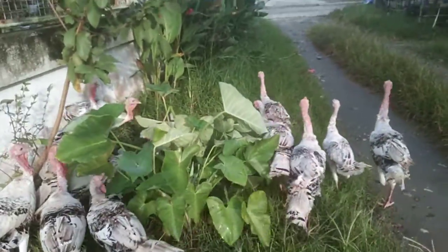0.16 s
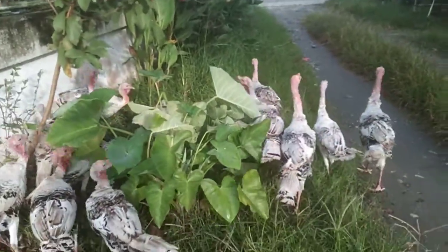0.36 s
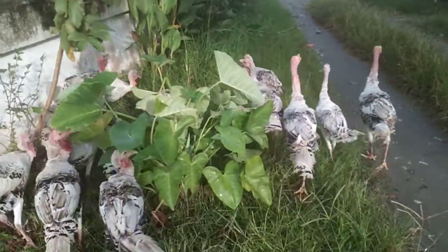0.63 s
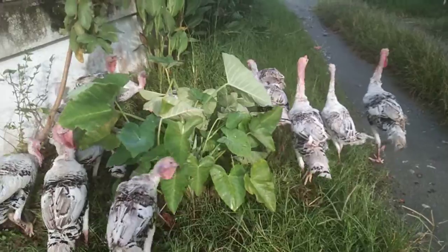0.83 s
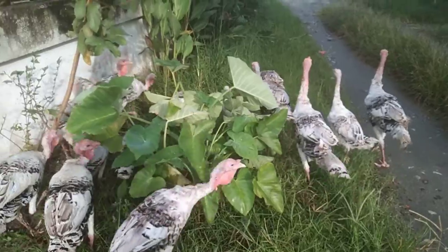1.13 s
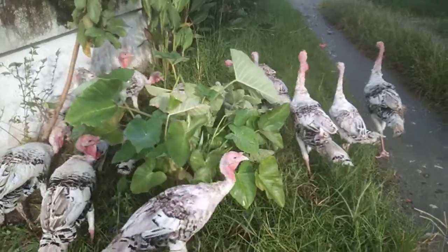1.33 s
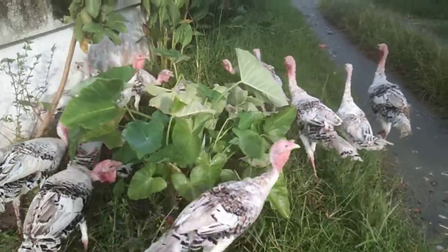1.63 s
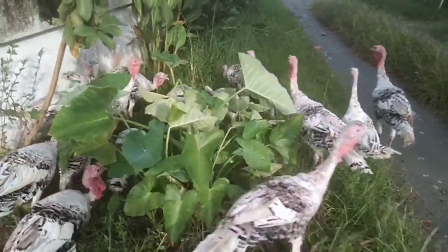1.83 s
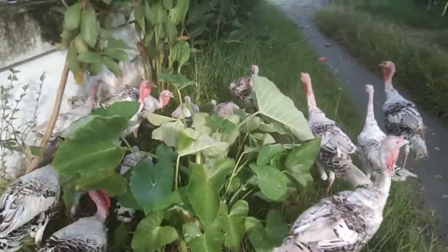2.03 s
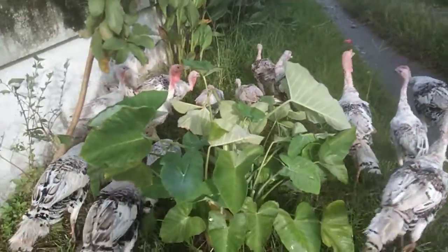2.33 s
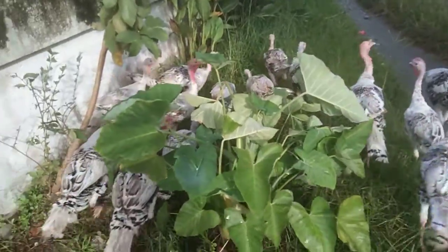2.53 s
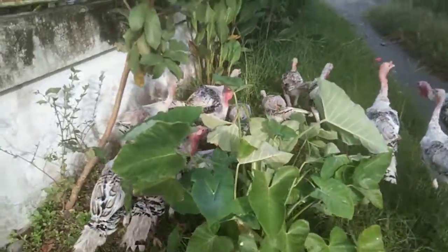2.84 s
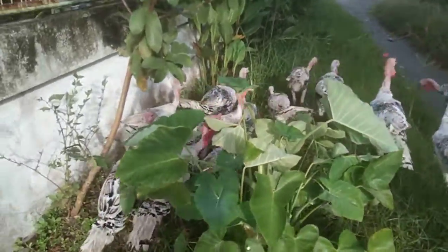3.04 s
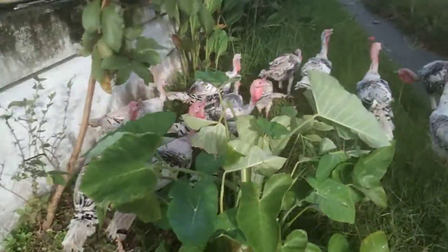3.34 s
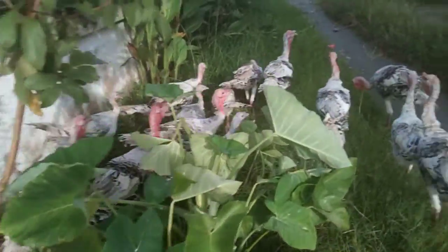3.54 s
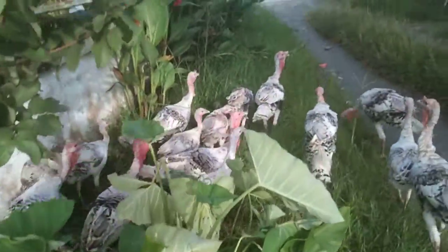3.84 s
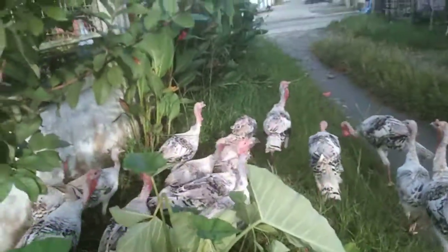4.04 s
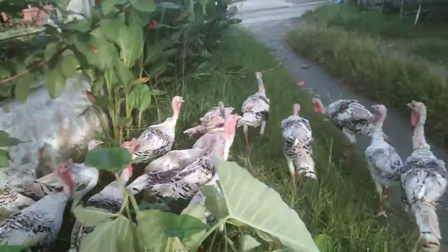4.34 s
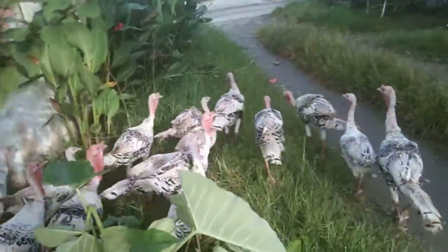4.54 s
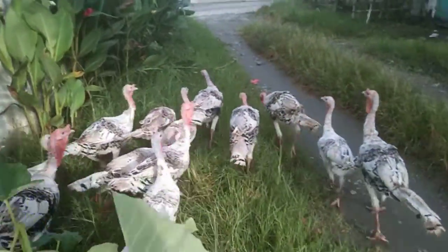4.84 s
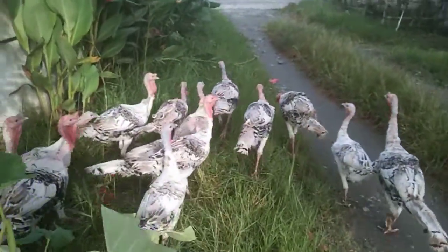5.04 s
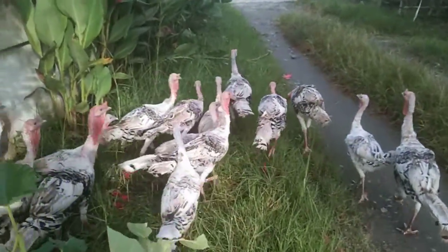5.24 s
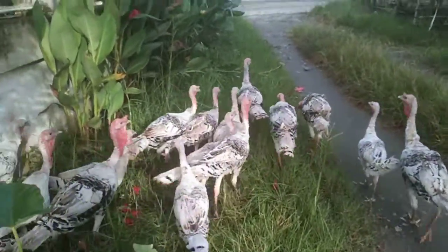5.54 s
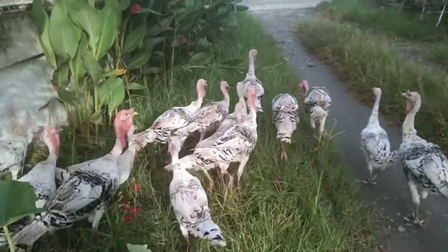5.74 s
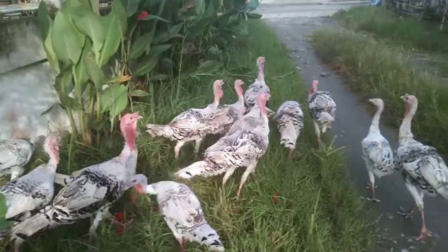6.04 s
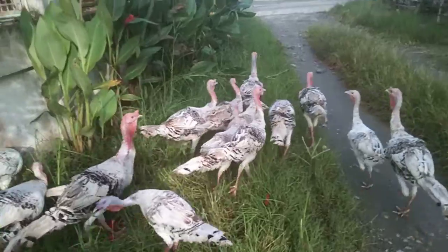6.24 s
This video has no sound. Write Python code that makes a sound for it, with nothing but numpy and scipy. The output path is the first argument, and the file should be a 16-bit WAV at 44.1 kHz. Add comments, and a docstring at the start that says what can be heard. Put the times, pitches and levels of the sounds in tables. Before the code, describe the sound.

After a soft peep and a rustle, one nearby turkey lets out a loud, raspy, drawn-out call that ends on a held note. Many quieter peeps and clucks follow as the flock moves through weeds, with rustling, small stem snaps and a dull thud midway. The outdoor background holds faint high insect trills, far chirps and a low hum.

```python
"""Turkeys in weeds beside a wall, over insect trills, far hiss and a wavering low hum.
0-0.6 s: a peep, a cluck, a rustle. 0.6-2.2 s: one close bird gives a hoarse four-part call,
a vibrating membrane shaken by unsteady airflow; the wall and trees answer.
From 2.2 s: the flock pushes on with soft gliding peeps and clucks. Bodies brush leaves and grass,
stems snap underfoot (densest near 4.2 s, with a dull thud), and small chirps sound far off."""
import sys
import numpy as np
from scipy import signal
from scipy.fft import rfft, irfft, next_fast_len
from scipy.io import wavfile
from scipy.ndimage import uniform_filter1d, map_coordinates

SR = 44100
rng = np.random.default_rng(int(sys.argv[2]) if len(sys.argv) > 2 else 0)


def put_to_file(sound):
    """Save the sound as 16-bit audio at rate SR, in the file named by the first command-line argument."""
    columns = np.atleast_2d(sound).T  # one column per channel
    safe = np.clip(columns, -1, 1)
    whole_steps = np.round(safe * 32767)
    wavfile.write(sys.argv[1], SR, whole_steps.astype(np.int16))


N = 281358

# noise colours: (frequency [Hz], relative density [dB])
AIR_SPECTRUM = [(2500, -16.5), (3600, -19), (6500, -10.5), (9200, -11), (12000, -6.5), (15500, -17)]
HUM_SPECTRUM = [(25, -24.5), (55, -13.5), (90, 0.5), (125, -5.5), (190, -16.5), (300, -49)]
THUD_SPECTRUM = [(140, -19), (200, -8.5), (400, -6.5), (520, -10), (700, -75.5)]
LEAF_SPECTRUM = [(350, -52), (600, -6.5), (1300, -3), (2000, -1), (2700, -10.5), (3000, -15), (3300, -49)]
GRASS_SPECTRUM = [(3000, -76.5), (3400, -26), (3900, -9), (6500, -6), (7800, -8), (9100, -7),
                  (11500, -18.5), (15500, -28)]
RASP_SPECTRUM = [(400, -65.5), (600, -13), (1200, -2), (1700, 1.5), (2300, 6.5), (2750, -9), (3200, -2.5),
                 (3800, -18.5), (5800, -17), (9000, -24.5), (12000, -27.5), (16000, -51)]
# background envelopes: (time [s], level [dB])
HUM_LEVEL = [(0.0, -57.5), (0.21, -48), (0.28, -56.5), (1.26, -62.5), (1.56, -83.5), (1.85, -59),
             (1.97, -79.5), (2.26, -51.5), (2.36, -61.5), (2.59, -59.5), (2.93, -85.5), (3.04, -52),
             (3.29, -69), (4.21, -64), (5.54, -71), (5.63, -57.5), (5.93, -85.5), (6.38, -62)]
TRILL_LEVEL = [(0, -68), (.35, -60), (.6, -75), (2.2, -60.5), (2.9, -62.5), (3.5, -57.5), (4.3, -57.5),
               (4.7, -56), (5.3, -60.5), (6.38, -58)]
# insect bands: (centre [Hz], width [Hz], gain [dB])
TRILL_BANDS = [(7417, 230, -4.5), (8250, 310, -1.5)]
# soft thuds: (time [s], level [dB], t60 [s])
THUD_HITS = [(0, -53, 1), (.71, -45.5, 0.29), (1.77, -50.5, .3), (2.12, -64, 0.24), (2.97, -54.5, 0.16),
             (3.5, -48.5, 0.21), (3.6, -48, 0.28), (4.2, -39.5, 0.3), (4.81, -54.5, 0.22)]
# far chirps: (time [s], level [dB], start pitch [Hz], t60 [s])
FAR_CHIRPS = [(2.7313, -50, 4740, 0.3), (3.1118, -48, 4180, 0.18), (3.661, -47, 4840, 0.23),
              (4.0694, -53.5, 3720, 0.64), (5.0, -61, 3440, 0.3), (5.555, -55, 3510, 0.22),
              (5.612, -52.5, 4120, 0.18), (6.134, -61, 4820, 0.24)]

# flock stirring: (time [s], leaves [dB], leaf gain below LEAF_SHELF_HZ [dB], grass [dB])
RUSTLE_LEVELS = [(0, -49.5, -3.5, -65), (.3, -70, 1, -62.5), (.62, -93, -1.5, -82), (2.2, -55.5, 4, -60.5),
                 (2.4, -78, -21, -61.5), (2.65, -75.5, -6.5, -61), (2.9, -61.5, 2, -67),
                 (3.15, -62, -8, -69), (3.35, -58, -21, -75), (3.47, -55.5, -22.5, -59.5),
                 (3.55, -52.5, -5, -58), (3.85, -61, -11, -77.5), (3.96, -60, -1, -81),
                 (4.13, -76, -7.5, -65), (4.3, -53.5, 7.5, -52), (4.8, -57, 0.5, -59.5),
                 (5.13, -65.5, 3, -61), (5.22, -86, -2, -68), (5.5, -88, 7, -106), (5.7, -58.5, 4, -74),
                 (6.38, -60, -15, -62.5)]
# single bodies passing: (time [s], 15 dB decay time [s], leaves [dB], grass [dB])
BODY_BRUSHES = [(0.04, 0.039, -54, -51.5), (.185, 0.03, -54, -53), (2.37, 0.051, -51, -42.5),
                (2.63, 0.057, -82, -57.5), (2.927, 0.042, -71, -61), (3.009, 0.049, -44, -73),
                (3.11, 0.033, -86, -74), (3.388, 0.07, -76, -50), (3.53, 0.052, -68, -53),
                (3.667, 0.102, -52, -59), (3.996, 0.1, -55.5, -47.5), (4.158, 0.075, -51, -39),
                (4.192, 0.054, -41.5, -51.5), (4.788, 0.035, -39, -39.5), (5.591, 0.023, -41.5, -69.5),
                (6.17, 0.085, -45, -62.5)]
# stems underfoot: (time [s], bright part [dB], dull part [dB], t60 [s])
STEM_SNAPS = [(.181, -49.5, -52, 0.086), (0.3164, -45, -46.5, 0.24), (2.379, -47, -56, 0.1),
              (2.6171, -45, -63.5, 0.12), (2.9599, -49.5, -72, 0.072), (3.5032, -34, -42, 0.1),
              (3.5317, -47, -29, 0.046), (3.646, -49.5, -43.5, 0.073), (4.0133, -52.5, -35, 0.04),
              (4.154, -32, -44, 0.051), (4.1617, -40, -30.5, 0.039), (4.1982, -29, -44.5, 0.17),
              (4.208, -30.5, -26, 0.13), (4.2252, -26.5, -33.5, 0.035), (4.815, -42.5, -27, 0.054),
              (4.8526, -45, -69, 0.097), (5.04, -62.5, -53, .06), (5.12, -54, -56.5, 0.089),
              (5.7416, -56, -46, 0.08), (5.971, -58, -44, 0.13), (6.0117, -45, -42, 0.19),
              (6.176, -48.5, -68, 0.11), (6.3366, -47.5, -58, 0.16)]

# peeps: (start [s], end [s], pitch [Hz], sag [Hz/s], drop time constant [s],
#         start level [dB], knee level [dB], end level [dB])
PEEP_NOTES = [(0, 0.07, 1360, 300, 0.014, -44.5, -57.5, -44.5),
              (2.605, 2.836, 1164, 148, 0.012, -87, -52, -41.5),
              (2.962, 3.049, 1357, 1500, .012, -61, -49, -43),
              (3.688, 3.845, 1484, 597, 0.051, -43, -46.5, -48),
              (3.89, 4.002, 1870, 2180, .006, -48.5, -54, -70),
              (3.911, 4.026, 1500, 490, 0.014, -62, -53, -51),
              (4.06, 4.255, 1556, 2960, 0.021, -63, -50, -49),
              (4.32, 4.585, 1240, 223, 0.015, -65, -43.5, -45),
              (4.355, 4.431, 1600, 4080, .03, -48, -47.5, -43.5),
              (4.58, 4.636, 1480, 5050, 0.019, -58, -49.5, -41.5),
              (4.745, 4.803, 1430, 1010, 0.013, -69, -58, -35.5),
              (5.332, 5.627, 1602, 398, .033, -63, -42.5, -48.5),
              (5.74, 6.006, 1257, 418, 0.013, -55, -50, -41),
              (5.783, 5.882, 1587, 945, .012, -50, -36, -52),
              (6.081, 6.22, 1557, 2290, 0.015, -48.5, -57.5, -38),
              (6.29, 6.401, 848, 1830, 0.0075, -50, -42, -48),
              (6.319, 6.412, 1520, 1590, 0.0074, -64, -48, -58)]
# clucks: (time [s], level [dB], top pitch [Hz])
CLUCK_NOTES = [(.18, -52.5, 842), (2.565, -57.5, 1150), (2.89, -36, 1400), (3.24, -56, 1200),
               (3.885, -43, 1500), (3.985, -51, 1115), (4.312, -41, 1270), (4.487, -38, 1340),
               (4.637, -35, 1530), (5.308, -48, 1300), (5.698, -37, 1600), (5.74, -35.5, 826),
               (6.056, -34, 1530), (6.23, -42, 1040)]
# throat response for peeps and clucks: (frequency [Hz], gain [dB])
FLOCK_THROAT = [(600, -0.5), (750, 0.5), (950, -3), (1150, 1.5), (1320, -1), (1500, 1), (1800, -5.5)]
OCTAVE_GAIN = [(1300, -30), (1700, -12), (2300, -14), (2700, -60)]

# close call, a table per note, two voices at times: (time [s], pitch [Hz])
CALL_PITCH = [
    [(.65, 796), (.675, 798), (.7, 779), (.77, 764), (.82, 750), (.89, 750)],
    [(.895, 700), (.91, 740), (.935, 746), (.97, 742), (1.0, 714), (1.04, 724), (1.1, 736), (1.18, 742),
     (1.24, 735), (1.3, 709), (1.35, 700), (1.385, 638), (1.45, 604), (1.5, 597), (1.57, 589), (1.605, 676)],
    [(1.597, 745), (1.61, 790), (1.65, 794), (1.85, 790), (2.0, 782), (2.08, 764), (2.1, 700), (2.15, 640)],
    [(.635, 570), (.66, 612), (.68, 641), (.702, 715)],
    [(.77, 626), (.79, 594), (.88, 590), (.915, 679)],
    [(.925, 832), (.95, 853), (1.0, 820), (1.08, 820)],
]
# same notes: (time [s], voice [dB], partials above the 4th [dB], rasp [dB])
CALL_LEVELS = [
    [(.65, -47, -75, -37), (.675, -38, -47, -45.5), (.692, -40, -47, -43.5), (.7, -16.5, -48, -36),
     (.76, -18.5, -51, -34), (.772, -45, -52.5, -48), (.8, -38, -50, -42.5), (.89, -50, -71, -40)],
    [(.895, -46.5, -59.5, -43.5), (.908, -24, -49, -37), (.935, -21, -39.5, -36.5),
     (.99, -29, -38.5, -33.5), (1.03, -32.5, -37.5, -38.5), (1.07, -22.5, -40, -41),
     (1.18, -22.5, -37, -47.5), (1.24, -22, -37, -56), (1.265, -29.5, -39, -46), (1.3, -21.5, -39.5, -46),
     (1.34, -24.5, -43.5, -37), (1.4, -20, -44, -46.5), (1.5, -35, -50.5, -35), (1.605, -23.5, -54.5, -41)],
    [(1.595, -47.5, -54, -44), (1.607, -22, -53, -36), (1.7, -21, -39, -43.5), (1.78, -21, -38.5, -48.5),
     (1.86, -18, -39, -51.5), (2.01, -18.5, -44.5, -49.5), (2.028, -26.5, -37.5, -49),
     (2.046, -19, -39.5, -53), (2.075, -23.5, -41.5, -44), (2.1, -33.5, -45.5, -36.5),
     (2.15, -57, -52.5, -60)],
    [(.633, -48, -69, -41), (.645, -30, -69.5, -47.5), (.68, -22.5, -56, -56.5),
     (.704, -29.5, -72.5, -60.5)],
    [(.77, -21.5, -75, -61.5), (.79, -30.5, -75, -56.5), (.88, -36, -58, -49), (.917, -19.5, -57, -54)],
    [(.925, -34.5, -76, -57.5), (.945, -20.5, -71, -49), (.98, -17.5, -75.5, -54), (1.08, -46, -83, -55.5)],
]
# airflow: (time [s], unsteadiness [0-1])
HOARSENESS = [(.64, .5), (.7, .05), (.76, .05), (.79, .6), (.9, .45), (.97, .7), (1.05, .6), (1.08, .07),
              (1.24, .09), (1.3, .4), (1.58, .6), (1.63, .1), (1.7, .04), (2.0, .04), (2.07, .25),
              (2.09, .95)]
# subharmonics, every other cycle stronger: (time [s], level [dB])
SUBHARMONIC_LEVEL = [(1.7, -68), (1.84, -67.5), (1.99, -60), (2.05, -78)]
# throat and beak response, partials 1-4 (LOW) and above (HIGH): (frequency [Hz], gain [dB])
THROAT_LOW = [(580, -37), (740, -25), (850, -16.5), (1200, -7.5), (1480, -1), (1700, -0.5), (1900, -22.5),
              (2120, 1.5), (2230, -5.5), (2340, -30), (2550, -20.5), (2950, -25.5), (3150, -18.5),
              (3400, -8)]
THROAT_HIGH = [(2800, -2.5), (3200, 16.5), (3500, -20.5), (4300, -11.5), (5000, -14), (5900, -5.5),
               (6700, -6.5), (7400, -10), (8800, -11), (9700, -16.5), (11000, -32.5), (16000, -41)]
HELD_THROAT_LOW = [(640, -15.5), (790, -31), (1300, -4), (1580, 0), (2000, -17), (2370, -30), (3000, -41),
                   (3170, -22)]
HELD_THROAT_HIGH = [(3900, -19), (4750, -27.5), (5530, -1.5), (6300, -13.5), (7900, -13.5), (8700, -31.5),
                    (9500, -21), (11000, -24), (16000, -49.5)]
# echo of wall and trees: (frequency [Hz], t60 [s])
YARD_DECAY = [(500, 0.87), (1500, 0.47), (4000, 0.51), (10000, 0.05)]

LEAF_SHELF_HZ, BRUSH_RISE_S, CRACK_DB = 1500, .012, -4.5
SLACK_HZ, KNEE_TIME_CONSTANTS = 640, 3.5  # slack membrane's pitch; length of a peep's drop
POP_S, POP_HZ, CLUCK_S, CLUCK_FADE_DB = .006, 750, .024, 16
HELD_AFTER_S = 2.0  # the call note ending after this is the held one
FUNDAMENTAL_DB_PER_DB, SWELL_DB = .61, 3.5
BAND_LIMIT_HZ = 15800


def amp(db):
    """Decibels to gain."""
    return 10 ** (np.asarray(db) / 20)


def unit(x):
    """Scale to rms 1."""
    return x / np.sqrt(np.mean(x ** 2) + 1e-20)


def along(points, hz):
    """Read (frequency [Hz], value) points on a log axis."""
    knots_hz, values = np.transpose(points)
    return np.interp(np.log(hz + 1), np.log(knots_hz + 1), values)


def curves(rows):
    """Per-sample curve for each column after the time."""
    times_s, *columns = np.transpose(rows)
    return [np.interp(np.arange(N) / SR, times_s, c) for c in columns]


def note(rows, edge_s):
    """Sample indices, column curves and edge fade of one note."""
    times_s, *columns = np.transpose(rows)
    at = np.arange(max(0, round(times_s[0] * SR)), min(N, round(times_s[-1] * SR)))
    t = at / SR
    ramp = np.clip(np.minimum(t - times_s[0], times_s[-1] - t) / edge_s, 0, 1)
    return at, [np.interp(t, times_s, c) for c in columns], np.sin(ramp * np.pi / 2) ** 2


def wobble(rate_hz):
    """Smooth random curve with knots at rate_hz."""
    knots = rng.standard_normal(int(N * rate_hz / SR) + 4)
    return map_coordinates(knots, [np.arange(N) * rate_hz / SR])


def shaky(share, rate_hz):
    """Complex gain near unit power: steady but for a wandering share."""
    share = np.clip(share, 0, 1)
    return np.sqrt(1 - share ** 2) + share * (wobble(rate_hz) + 1j * wobble(rate_hz)) / np.sqrt(2)


def bursts(rows, rise_s):
    """Gain curve of decaying bursts: (time [s], level [dB], t60 [s])."""
    out, t = np.zeros(N + SR), np.arange(SR // 2) / SR
    for start_s, db, t60_s in rows:
        out[round(start_s * SR):][:len(t)] += (1 - np.exp(-t / rise_s)) * amp(db - 60 * t / t60_s)
    return out[:N]


def filtered(x, response):
    """Apply a zero-phase gain, response(hz)."""
    size = next_fast_len(N + SR // 2)
    return irfft(rfft(x, size) * response(np.fft.rfftfreq(size, 1 / SR)), size)[..., :N]


def rush(spectrum, gain, patchy_db, grain_db):
    """Coloured noise with spiky grains and streaks of random gain."""
    spiky = rng.standard_normal(N) * amp(grain_db * wobble(600))
    bins = signal.stft(spiky, nperseg=512)[2]
    streaks = uniform_filter1d(rng.standard_normal(bins.shape), size=4, axis=0)
    streaks = uniform_filter1d(streaks, size=18, axis=1)
    noise = signal.istft(bins * amp(patchy_db * unit(streaks)), nperseg=512)[1][:N]
    colour = lambda hz: amp(along(spectrum, hz))
    return filtered(gain * noise, colour) / np.std(filtered(noise, colour))


def yard(x):
    """Echo of wall and trees; each frequency decays at its own rate."""
    hz, t, bins = signal.stft(rng.standard_normal(SR), SR, nperseg=256)
    decay = amp(-60 * t / along(YARD_DECAY, hz)[:, None])
    tail = signal.istft(bins * decay, SR, nperseg=256)[1]
    delayed = np.pad(x, (500, 0))
    return signal.fftconvolve(delayed, tail / np.linalg.norm(tail))[:N]


def air():
    """Steady far hiss."""
    return rush(AIR_SPECTRUM, amp(-72), patchy_db=5, grain_db=3)


def hum():
    """Far low hum, wavering in level."""
    return rush(HUM_SPECTRUM, amp(curves(HUM_LEVEL)[0]), patchy_db=0, grain_db=-.5)


def thuds():
    """Dull thuds near the microphone, over a faint floor."""
    return rush(THUD_SPECTRUM, amp(-86) + bursts(THUD_HITS, rise_s=.01), patchy_db=6, grain_db=-.5)


def insects():
    """Many far trills blur into narrow bands, each fluttering on its own."""
    out = np.zeros(N)
    for centre_hz, width_hz, db in TRILL_BANDS:
        band = filtered(rng.standard_normal(N), lambda hz: np.exp(-((hz - centre_hz) / width_hz) ** 2))
        out += amp(db + 2 * wobble(6) + 2 * wobble(35)) * unit(band)
    return amp(curves(TRILL_LEVEL)[0]) * out


def chirps():
    """Small far chirps: husky, decaying, falling in pitch."""
    out, t = np.zeros(N + SR), np.arange(SR // 5) / SR
    husky = shaky(.95, rate_hz=420)
    for start_s, db, hz, t60_s in FAR_CHIRPS:
        at = round(start_s * SR) + np.arange(len(t))
        envelope = (1 - np.exp(-t / .0017)) * amp(db - 60 * t / t60_s)
        phase = 2 * np.pi * hz * (t - .25 * t ** 2)
        out[at] += envelope * (husky[at] * np.exp(1j * phase)).imag
    return out[:N]


def rustle():
    """Bodies brush leaves and grass; stems snap, then shake out."""
    leaf_brush = bursts([(s, db, 4 * decay_s) for s, decay_s, db, _ in BODY_BRUSHES], BRUSH_RISE_S)
    grass_brush = bursts([(s, db, 4 * decay_s) for s, decay_s, _, db in BODY_BRUSHES], BRUSH_RISE_S)
    crack = bursts([(s, db, .007) for s, db, _, _ in STEM_SNAPS], rise_s=1e-4)
    knock = bursts([(s, db, .007) for s, _, db, _ in STEM_SNAPS], rise_s=1e-4)
    grass_shake = bursts([(s, db - 8, t60_s) for s, db, _, t60_s in STEM_SNAPS], rise_s=5e-4)
    leaf_shake = bursts([(s, db - 4.5, t60_s) for s, _, db, t60_s in STEM_SNAPS], rise_s=5e-4)
    leaf_db, shelf_db, grass_db = curves(RUSTLE_LEVELS)
    leaf_gain = amp(leaf_db + 2 * wobble(12)) + leaf_brush + knock + leaf_shake
    leaves = rush(LEAF_SPECTRUM, leaf_gain, patchy_db=5, grain_db=2.5)
    leaves += (amp(shelf_db) - 1) * filtered(leaves, lambda hz: 1 / (1 + (hz / LEAF_SHELF_HZ) ** 8))
    grass_gain = amp(grass_db + 2.5 * wobble(25) + 2 * wobble(7)) + grass_brush + crack + grass_shake
    grass = rush(GRASS_SPECTRUM, grass_gain, patchy_db=4, grain_db=3)
    bright_noise = unit(np.diff(rng.standard_normal(N + 1)))
    return leaves + grass + amp(CRACK_DB) * crack * bright_noise


def peeps():
    """Notes that sag, then drop ever faster to the slack membrane's pitch."""
    for start_s, end_s, start_hz, sag_hz_per_s, drop_s, start_db, knee_db, end_db in PEEP_NOTES:
        knee_s = max(start_s + .012, end_s - KNEE_TIME_CONSTANTS * drop_s)
        at, (db,), fade = note([(start_s, start_db), (knee_s, knee_db), (end_s, end_db)], edge_s=.004)
        sagging_hz = start_hz - sag_hz_per_s * (at / SR - start_s)
        hz = sagging_hz - (sagging_hz - SLACK_HZ) * np.exp((at / SR - end_s) / drop_s)
        yield at, hz, db, fade


def clucks():
    """Notes that pop, flick upward and die away."""
    for start_s, pop_db, top_hz in CLUCK_NOTES:
        rows = [(start_s, SLACK_HZ, pop_db - 12),
                (start_s + POP_S, POP_HZ, pop_db),
                (start_s + CLUCK_S, top_hz, pop_db - CLUCK_FADE_DB)]
        at, (hz, db), fade = note(rows, edge_s=.003)
        yield at, hz, db, fade


def flock_voices():
    """Peeps and clucks as breathy whistles, plus the octave the throat lets through."""
    out, tremble = np.zeros(N), shaky(.5, rate_hz=70)
    for at, hz, db, fade in [*peeps(), *clucks()]:
        whistle = tremble[at] * np.exp(2j * np.pi * np.cumsum(hz) / SR)
        octave = amp(along(OCTAVE_GAIN, 2 * hz)) * whistle ** 2
        out[at] += fade * np.sqrt(2) * amp(db + along(FLOCK_THROAT, hz)) * (whistle + octave).imag
    return out


def close_call():
    """Membrane partials shaken by unsteady airflow, over turbulent rasp and hiss past the beak."""
    out = np.zeros(N)
    rasp = rush(RASP_SPECTRUM, .97, patchy_db=8, grain_db=4.5)
    breath = rush(THROAT_HIGH[2:], .56, patchy_db=8, grain_db=-1.5)
    (hoarse,), (subharmonic_db,) = curves(HOARSENESS), curves(SUBHARMONIC_LEVEL)
    for pitch, levels in zip(CALL_PITCH, CALL_LEVELS):
        at, (voice_db, upper_db, rasp_db), fade = note(levels, edge_s=.004)
        hz = curves(pitch)[0][at]
        held = levels[-1][0] > HELD_AFTER_S
        low, high = (HELD_THROAT_LOW, HELD_THROAT_HIGH) if held else (THROAT_LOW, THROAT_HIGH)
        jitter = .017 * (hoarse * wobble(90))[at]
        phase = 2 * np.pi * np.cumsum(hz * (1 + jitter)) / SR
        tone = amp(rasp_db) * rasp[at]
        tone += amp(subharmonic_db[at]) * (np.sin(1.5 * phase) + np.sin(2.5 * phase))
        tone += amp(upper_db - 4) * (.17 + hoarse[at]) * breath[at]
        for k in range(1, 21):
            lower_db = FUNDAMENTAL_DB_PER_DB * voice_db if k == 1 else voice_db
            swell_db = SWELL_DB * wobble(18)[at]
            db = lower_db + along(low, k * hz) if k <= 4 else upper_db + along(high, k * hz) + swell_db
            smear = hoarse * (1 + .2 * k) + .0035 * k ** 2
            flutter = shaky(smear, rate_hz=50 + 20 * k)[at]
            tone += np.sqrt(2) * amp(db) * (flutter * np.exp(1j * k * phase)).imag
        out[at] += fade * tone
    return out


def scene():
    """Mono mix; only the bird voices feed the echo."""
    loud = close_call()
    soft = flock_voices() + chirps()
    hiss = air()
    echo = yard(amp(-11) * loud + amp(-16) * soft)
    return (loud + soft + echo + rustle() + insects() + hum() + thuds() + hiss)[None]


def record(dry):
    """Camera band limit: brick-wall low-pass."""
    return filtered(dry, lambda hz: hz < BAND_LIMIT_HZ)


dry = scene()
out = record(dry)
put_to_file(out)
```